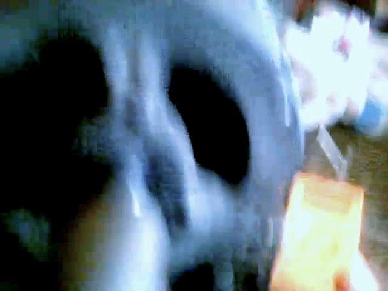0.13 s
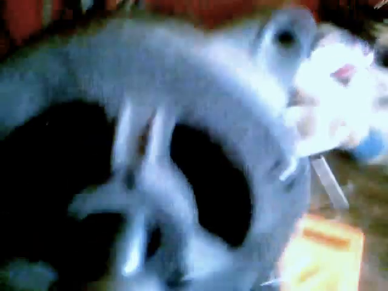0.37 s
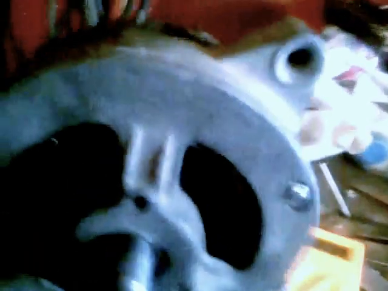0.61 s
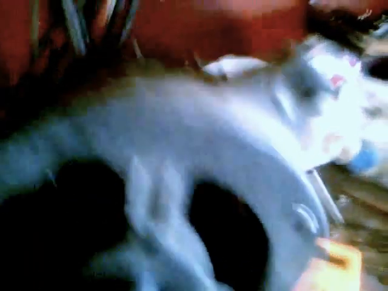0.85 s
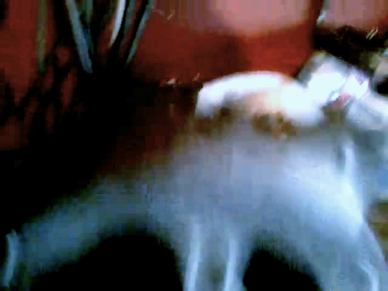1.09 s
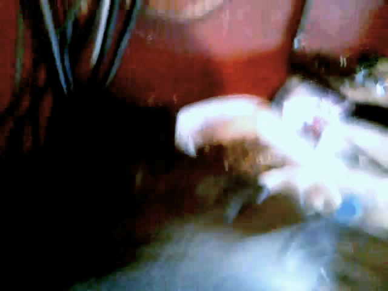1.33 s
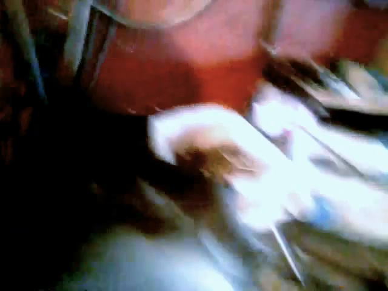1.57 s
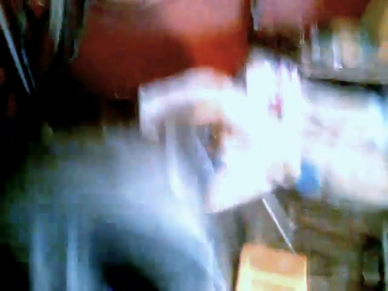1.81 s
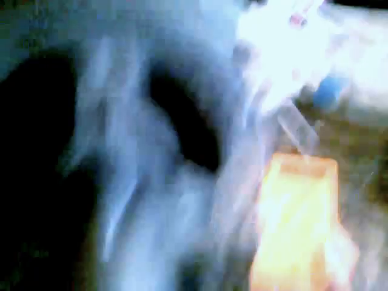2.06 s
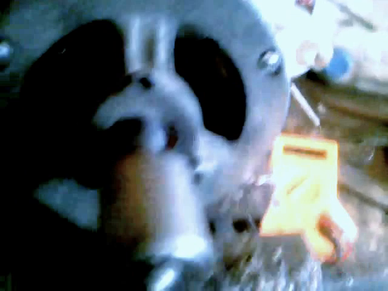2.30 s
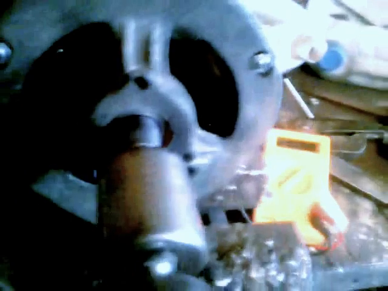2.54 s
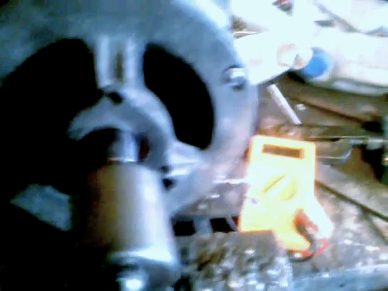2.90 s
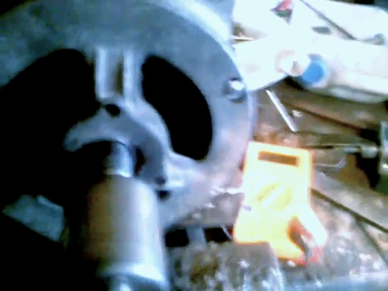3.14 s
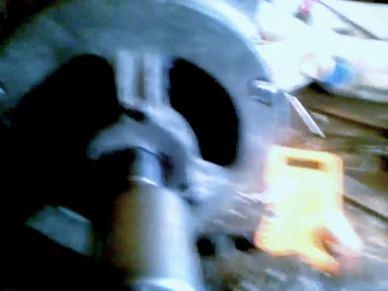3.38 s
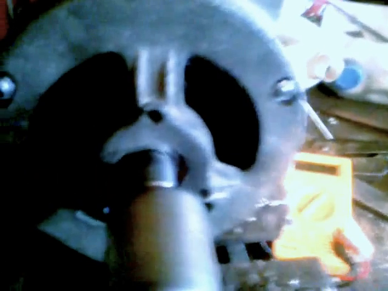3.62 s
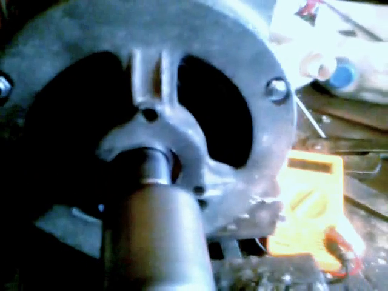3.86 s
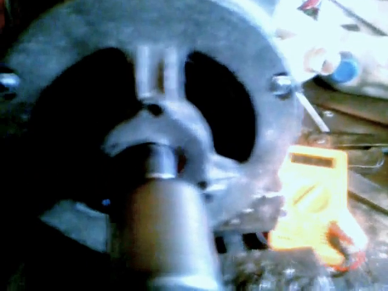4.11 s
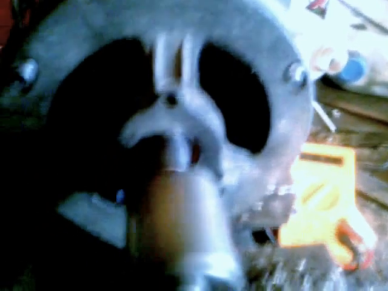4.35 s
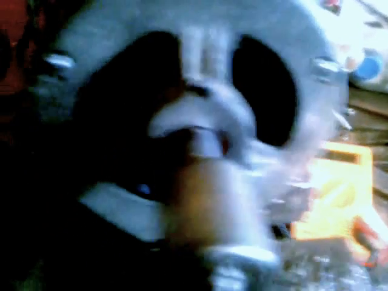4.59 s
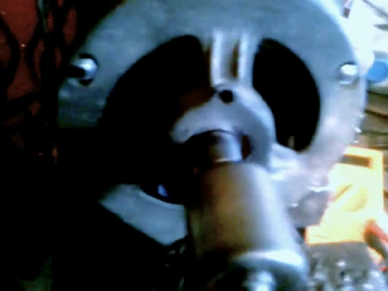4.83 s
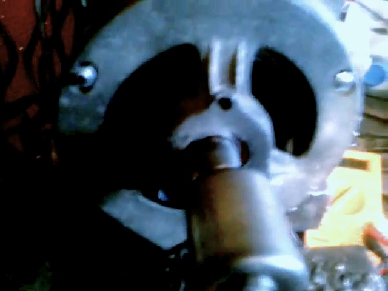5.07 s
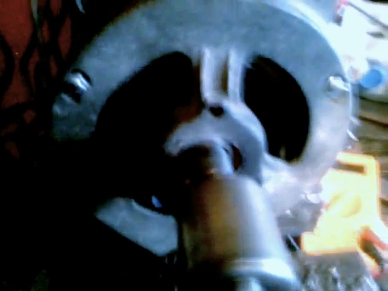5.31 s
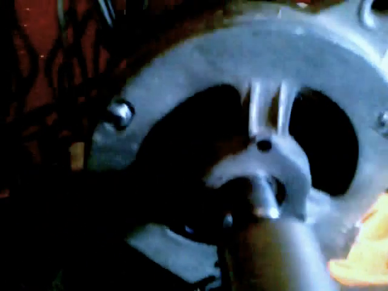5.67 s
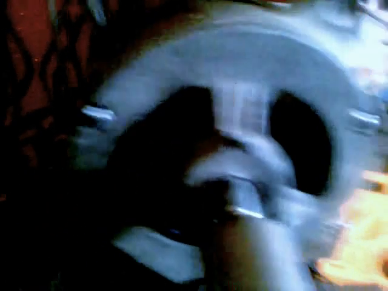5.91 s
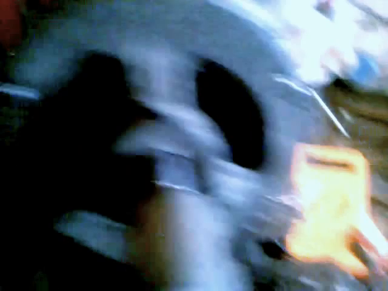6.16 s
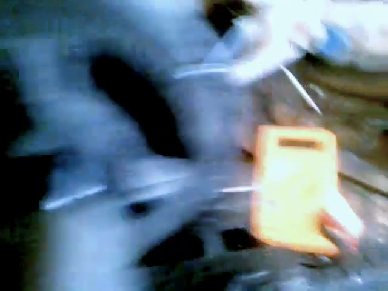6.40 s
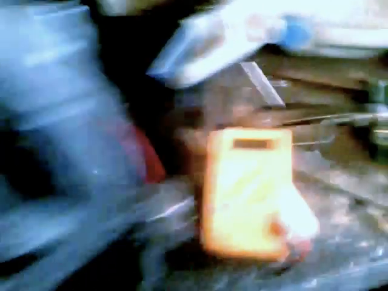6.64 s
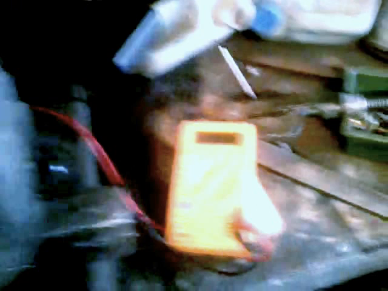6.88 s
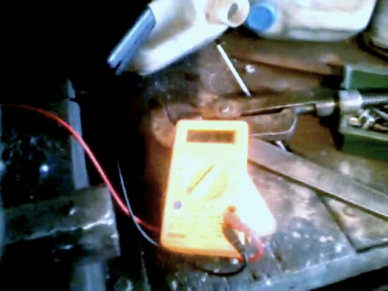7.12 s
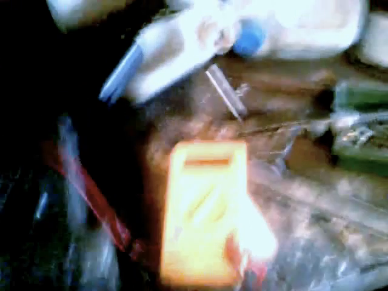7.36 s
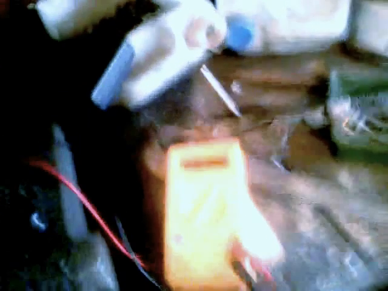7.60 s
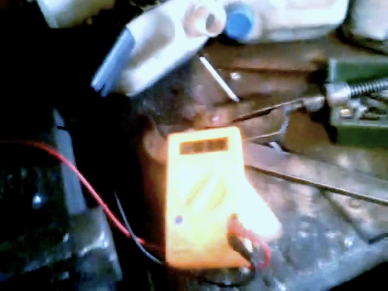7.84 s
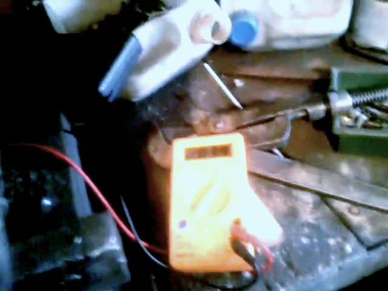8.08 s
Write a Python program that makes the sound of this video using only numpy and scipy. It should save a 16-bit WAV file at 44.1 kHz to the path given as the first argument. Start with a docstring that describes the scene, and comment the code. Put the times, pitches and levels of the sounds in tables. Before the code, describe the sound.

Handling clicks echo lightly, a trigger cracks, and a clattering electric drill runs up into a rough, overloaded grinding whir with a wavering whine.

```python
"""Faint air and hands rubbing a tool: filtered noise, with clicks that ring as rough sines and leave a room tail.
After a brief gap the trigger snaps and a hand drill on a workshop bench starts to spin an alternator.
The loose coupling knocks during run-up, noise bursts ringing the housing, while a low tone swells and bends.
Brushes, gears and fan then merge into a throbbing noise whir, over sines for armature hum and pole whine.
The small mono microphone swings from the alternator's face towards the bench, and its input overloads."""
import sys
import numpy as np
from scipy import signal
from scipy.fft import rfft, irfft
from scipy.io import wavfile

SR = 44100
rng = np.random.default_rng(int(sys.argv[2]) if len(sys.argv) > 2 else 0)


def unload_wav(signal):
    """Save mono or channel-first audio to the path in sys.argv[1] as 16-bit WAV at rate SR, clipped to [-1, 1]."""
    wavfile.write(
        sys.argv[1],
        SR,
        np.round(np.clip(np.atleast_2d(signal).T, -1, 1) * 32767).astype(np.int16),
    )


N = 366912

# Tone of the brush and gear grit, also heard in the scrape of the knocks.
# Each row: frequency in Hz, level in dB per Hz.
GRIT_COLOUR = [(150, -20), (250, -12), (366, -8.5), (435, -10), (535, -5), (1070, -3), (1670, 0.5),
               (1920, 1.5), (3460, -11.5), (4410, -9.5), (6120, -6.5), (10300, -3), (12600, -10),
               (15600, -12.5)]

AIR_DB = -59
DROPOUT_S = (2.881, 2.8935)   # air, hands and clicks fall silent between these times
TRIGGER_S, TRIGGER_DB = 2.8955, -12.5   # the switch snaps: a bare crack
RING_ROUGH = .035   # spread of the phase steps of a click's ring, radians per sample
CRACK_DB, CRACK_T60_S, CRACK_DB_PER_OCTAVE = -2, .008, -10   # relative to the ring, broad around its pitch
TAIL_DB_PER_OCTAVE, TAIL_ATTACK_S = -8.5, .004   # the tail is strongest near the click's own pitch

SWELL_TOP_S, SWELL_HALF_S, SWELL_TOP_HZ, SWELL_BEND_HZ = 3.72, .3, 198, 42
SWELL_DB, SWELL_EDGE_DB = -33.5, -16   # level at the top, change SWELL_HALF_S away from it
SWELL_RING_DB, SWELL_RING_EDGE_DB = -17.5, -70
SWELL_RING_HZ, SWELL_WIDTH_HZ = 2500, 90

REBOUND_S, REBOUND_DB, REBOUND_SCATTER = .0095, -3.5, .15   # each loud knock bounces once
KNOCK_T60_S, KNOCK_CRACK_DB, KNOCK_SPREAD_DB = 0.02, -11, 5
KNOCK_TICK_DB, KNOCK_TICK_T60_S = -24, 0.0025   # the first instant of metal on metal
RATTLE_SPREAD_DB = 6.5

GEAR_RATIO, POLE_PAIRS = 11 / 32, 6   # alternator turns per armature turn, pole cycles per alternator turn
HUM_WAVER_DB, WHINE_WAVER_DB = .8, 3.0
# Armature turns per s between which the labouring sound gives way to the free-running one.
RUN_UP_FROM, RUN_UP_TO = 40, 198
# Each a triple: labouring, free-running and faced, free-running and turned away.
TREBLE_DB, BASS_DB = (-10.5, 4, 2.5), (5, 0.5, 3)
THROB, RATTLE_DB = (0.3, 0.19, 0.22), (-12, -4, -2.5)   # depth per armature turn 0-1; relative to the whir
PEAK_WANDER_DB, RUMBLE_DB = 2.5, -37.5   # rumble relative to the whir
BENCH_ECHO_S, BENCH_ECHO_DB = 0.001082, -16.5
ECHO_SWAY = .12   # spread of the delay as a fraction: the hand is never still

OVERLOAD, KNEE = 0.71, 12   # ceiling of the input stage in full scale, sharpness of its bend
CUTOFF_HZ = 15950


def amp(db):
    """Gain of a level in dB."""
    return 10 ** (np.asarray(db) / 20)


def rms_one(x):
    """Scaled to rms 1."""
    return x / np.sqrt(np.mean(x ** 2) + 1e-20)


def in_time(rows, before):
    """Columns of a table at every sample, with their values ahead of the first row."""
    s, *columns = np.transpose(rows)
    return [np.interp(np.arange(N) / SR, s, c, left=b) for c, b in zip(columns, before)]


def at_hz(points, hz):
    """A spectrum read on a log-frequency axis."""
    point_hz, values = np.array(points).T
    return np.interp(np.log(hz), np.log(point_hz), values)


def drift(rate_hz):
    """Slow random wander of spread 1: noise through two equal low-pass poles, one value per 40 samples."""
    r = np.exp(-80 * np.pi * rate_hz / SR)
    noise = rng.standard_normal(N // 40 + 2002)
    slow = signal.lfilter([1], [1, -2 * r, r * r], noise)[2000:]   # skip the settling
    return np.interp(np.arange(N) / 40, np.arange(len(slow)), rms_one(slow))


def resonance(x, hz, width_hz):
    """Two-pole peak of gain 1 on top."""
    r = np.exp(-np.pi * width_hz / SR)
    gain = (1 - r * r) / 2
    return signal.lfilter([gain, 0, -gain], [1, -2 * r * np.cos(2 * np.pi * hz / SR), r * r], x)


def butter(x, order, hz, kind="low"):
    """Butterworth filter of the given kind."""
    return signal.sosfilt(signal.butter(order, hz, kind, fs=SR, output="sos"), x)


def band(x, low_hz, high_hz):
    """Butterworth band-pass."""
    return butter(x, 2, [low_hz, high_hz], "band")


def coloured(x, spectrum):
    """A spectrum laid on noise."""
    hz = np.maximum(np.fft.rfftfreq(len(x), 1 / SR), 1)
    return irfft(rfft(x) * amp(at_hz(spectrum, hz)), len(x))


def dying(impulses, t60):
    """Each impulse leaves an exponential tail."""
    return signal.lfilter([1], [1, -amp(-60 / (t60 * SR))], impulses + 1e-18)


def by_state(values, free, away):
    """Blend of a labouring, a faced and a turned-away value."""
    labouring, faced, turned = values
    return labouring + free * (faced + away * (turned - faced) - labouring)


def background_air():
    """Steady coloured noise behind everything."""
    # Each row: frequency in Hz, level in dB per Hz.
    air_colour = [(20, 2), (55, 0), (90, -10), (300, -5.5), (850, 0.5), (1600, -2), (2600, -2), (4000, 1),
                  (7000, -1), (10500, -2.5), (12000, -11), (15600, -9)]
    return amp(AIR_DB) * rms_one(coloured(rng.standard_normal(N), air_colour))


def hands():
    """Skin on the housing: a lumpy rumble and a thin rustle."""
    # Hands rubbing the tool. Each row: time in seconds, rumble level in dB, rustle level in dB.
    rubbing = [(0.2, -78, -71), (0.44, -73, -66), (0.73, -63, -45), (0.88, -66, -57), (1.02, -62, -54),
               (1.2, -72, -68), (1.6, -77, -68), (2.2, -78, -71)]
    fade_out = (rubbing[-1][0] + .1, -100, -100)
    rumble_db, rustle_db = in_time(rubbing + [fade_out], before=[-100, -100])
    low = band(band(rng.standard_normal(N), 110, 380), 90, 500)
    rumble = rms_one(low * amp(1.9 * drift(17.0)))
    thin = band(rng.standard_normal(N), 6400, 12000)
    rustle = rms_one(thin * amp(1.1 * drift(60.0)))
    return amp(rumble_db) * rumble + amp(rustle_db) * rustle


def clicks():
    """A brief ring and crack each, followed by the workshop's tail, which dies band by band."""
    # Hands and trigger. Each row: start in seconds, ring level in dB, pitch in Hz, tail level in dB.
    click_list = [(0.237, -38, 1960, -58), (0.518, -38, 10600, -54), (0.642, -38, 2400, -39),
                  (0.651, -41, 2380, -25), (0.672, -13, 8300, -32), (0.678, -15, 8300, -24),
                  (0.686, -5.5, 8200, -23), (0.816, -38, 12000, -58), (0.907, -27, 2120, -39),
                  (0.915, -39, 740, -33), (0.943, -39, 1400, -52), (1.058, -33, 2050, -50),
                  (1.064, -26, 2900, -29), (1.072, -16, 2500, -22), (1.083, -24.5, 8800, -33),
                  (1.085, -27, 1900, -45), (1.090, -26, 2720, -43), (1.253, -50, 1000, -70),
                  (1.365, -54, 1280, -80), (1.586, -41, 1500, -66), (1.822, -30, 1320, -44),
                  (1.824, -33, 694, -40), (1.93, -55, 633, -76), (2.0, -50, 4200, -74),
                  (2.509, -32, 9500, -58), (2.676, -33.5, 9500, -58), (2.836, -41, 10100, -55),
                  (2.8964, -12.5, 1890, -34), (2.897, -18, 5500, -38), (2.922, -31, 4500, -50),
                  (2.944, -24, 4100, -50), (2.962, -20, 4200, -44)]
    # Decay of the rings. Each row: pitch in Hz, time to fall 60 dB in seconds.
    ring_t60 = [(700, 0.043), (1500, .006), (9000, 0.0063)]
    # Decay of the workshop. Each row: frequency in Hz, time to fall 60 dB in seconds.
    room_t60 = [(500, 0.98), (1320, 0.43), (3480, 0.5), (6000, 0.33), (9190, 0.24), (14000, 0.18)]
    # Tone of the tail and of the trigger's crack. Each row: frequency in Hz, level in dB per Hz.
    room_colour = [(410, -47), (700, -5), (1120, -3.5), (1850, 5.5), (2960, 0), (3400, -8.5), (3700, -4),
                   (4970, 1), (9140, 5), (11000, 7), (15600, -13)]
    heard = 4 * SR
    out, trigger = np.zeros((2, heard))
    t = np.arange(SR // 8) / SR
    s, ring_db, pitch_hz, tail_db = np.transpose(click_list)
    starts = np.round(s * SR).astype(int)
    for at, db, hz in zip(starts, ring_db, pitch_hz):
        wander = np.cumsum(rng.normal(0, RING_ROUGH, len(t)))
        ring = np.sin(2 * np.pi * hz * t + wander)
        envelope = (1 - np.exp(-hz * t)) * amp(-60 * t / at_hz(ring_t60, hz))
        out[at:at + len(t)] += amp(db) * ring * envelope
    trigger[round(TRIGGER_S * SR)] = amp(TRIGGER_DB)
    room_noise = rms_one(coloured(rng.standard_normal(heard), room_colour))
    out += dying(trigger, CRACK_T60_S) * room_noise
    white = butter(rng.standard_normal(heard), 4, 11500)
    edges = 500 * 2 ** np.arange(0, 5.1, .5)   # half octaves
    for k, (low_hz, high_hz) in enumerate(zip(edges, edges[1:])):
        hz = np.sqrt(low_hz * high_hz)
        octaves_off = np.abs(np.log2(hz / pitch_hz))
        cracks, sent = np.zeros((2, heard))
        cracks[starts] = amp(ring_db + CRACK_DB + CRACK_DB_PER_OCTAVE * octaves_off)
        crack = band(dying(cracks, CRACK_T60_S) * white, low_hz, high_hz)
        out += crack * np.sqrt(SR / 2 / (high_hz - low_hz))
        # power sent to the walls; half the decay time, since it is power that dies
        sent[starts] = amp(2 * (tail_db + TAIL_DB_PER_OCTAVE * octaves_off))
        power = dying(sent, at_hz(room_t60, hz) / 2) - dying(sent, 6 * TAIL_ATTACK_S)
        shifted = np.roll(room_noise, 999 * k)   # unrelated noise in each band
        out += band(shifted, low_hz, high_hz) * np.sqrt(np.maximum(power, 0))
    return np.pad(butter(out, 4, 550, "high"), (0, N - heard))


def swell():
    """A bending sine and a narrow noise ring of the casing that rise and fall together in the run-up."""
    off = np.clip((np.arange(N) / SR - SWELL_TOP_S) / SWELL_HALF_S, -2, 2) ** 2
    hz = SWELL_TOP_HZ - SWELL_BEND_HZ * off
    tone = np.sqrt(2) * amp(SWELL_DB + SWELL_EDGE_DB * off ** 2) * np.sin(2 * np.pi * np.cumsum(hz) / SR)
    ring = resonance(rng.standard_normal(N), SWELL_RING_HZ, SWELL_WIDTH_HZ)
    ring = resonance(ring, SWELL_RING_HZ, SWELL_WIDTH_HZ)
    return tone + amp(SWELL_RING_DB + SWELL_RING_EDGE_DB * off) * rms_one(ring)


def knocks(turns, rattle_db):
    """Loud coupling knocks, and lighter uneven ones about once per armature turn as the gears take up play;
    each is a short scrape that drives every housing resonance with a strength of its own."""
    # Coupling knocks in run-up, about one per turn of the shaft. Each row: time in seconds, strength in dB.
    loud_knocks = [(2.9732, -7.5), (2.9846, 0.5), (3.0043, 1.5), (3.015, -2), (3.04, 8), (3.0544, -3),
                   (3.0864, 2), (3.1054, -12), (3.1213, -3), (3.1414, -1), (3.1557, 2), (3.1754, -2),
                   (3.1879, 2), (3.2186, 3), (3.253, -1), (3.276, -1), (3.2846, 6), (3.3184, 9), (3.351, 4),
                   (3.3822, 4), (3.411, 2), (3.4414, 1.5), (3.466, 2), (3.49, 1), (3.5151, 5.5),
                   (3.5474, -0.5), (3.5753, -7), (3.5935, 3.5), (3.6275, -5), (3.65, 5), (3.6806, 5),
                   (3.7077, 0), (3.7448, 3), (3.7796, 1), (3.8062, -8), (3.8328, -4), (3.854, 6),
                   (3.8777, 3), (3.903, 0), (3.937, -5), (3.9622, -4), (3.9824, -4), (4.0104, -12),
                   (4.0323, 2)]
    # Resonances of the housing. Each row: frequency in Hz, width in Hz, level in dB.
    housing = [(1220, 260, -25.5), (1460, 270, -1.5), (2293, 154, 4), (2900, 59, 0), (4200, 540, -5),
               (4660, 190, -27), (5405, 150, -2), (6450, 750, -6.5), (7730, 550, -31), (9280, 800, -7.5),
               (10730, 250, -9)]
    s, db = np.transpose(loud_knocks)
    late, soft = rng.standard_normal((len(s), 2)).T
    rebound_s = s + REBOUND_S * (1 + REBOUND_SCATTER * late)
    s, db = np.r_[s, rebound_s], np.r_[db, db + REBOUND_DB + 2 * soft]
    jittered_turns = turns + .08 * drift(40.0)
    each_turn = np.flatnonzero(np.diff(np.floor(jittered_turns)) > 0)
    uneven = rng.normal(0, RATTLE_SPREAD_DB, len(each_turn))
    at = np.concatenate([(s * SR).astype(int), each_turn])
    db = np.concatenate([db, rattle_db[each_turn] + uneven])
    strengths = rng.normal(0, KNOCK_SPREAD_DB, (len(at), len(housing)))
    blows, scrape = np.zeros(N), rng.standard_normal(N)
    blows[at] = amp(db + KNOCK_CRACK_DB)
    out = dying(blows, KNOCK_T60_S) * band(rms_one(coloured(scrape, GRIT_COLOUR)), 560, 9900)
    blows[at] = amp(db + KNOCK_TICK_DB)
    out += dying(blows, KNOCK_TICK_T60_S) * band(scrape, 3000, 16500)
    for (hz, width_hz, mode_db), own_db in zip(housing, strengths.T):
        blows[at] = amp(db + mode_db + own_db)
        out += resonance(dying(blows, KNOCK_T60_S) * scrape, hz, width_hz)
    return out


def tones(turns, hum_db, pole_db):
    """Sines locked to the two shafts: the lowest of each is steadier, the higher ones waver in strength."""
    # Armature hum. Each row: multiple of the armature speed, level in dB relative to the hum level.
    armature = [(1, 5), (4, -23), (6, -33), (8, -2.5), (11, -29), (24, -38), (27, -3.5), (33, -38)]
    # Alternator whine. Each row: multiple of the pole tone, level in dB relative to the pole level.
    poles = [(1, 0), (2, -2), (3, -9), (6, -3), (12, -9), (18, -12), (24, -5)]
    pole_cycles = turns * GEAR_RATIO * POLE_PAIRS
    out = np.zeros(N)
    for cycles, level_db, series in ((turns, hum_db, armature), (pole_cycles, pole_db, poles)):
        for multiple, db in series:
            waver_db = (HUM_WAVER_DB if multiple == 1 else WHINE_WAVER_DB) * drift(7)
            sine = np.sin(2 * np.pi * (multiple * cycles + rng.random()))
            out += np.sqrt(2) * amp(level_db + db + waver_db) * sine
    return out


def commutator(turns, level_db, free, away):
    """Brushes crossing the commutator bars, a rough whine: noise bands on multiples of the speed."""
    # Each row: multiple of the armature speed, low-pass corner of its noise in Hz,
    # level in dB relative to the whir when labouring, when faced, when turned away.
    bars = [(26.62, 500, -30, -5.5, -27), (49.1, 360, -38, -14, -50)]
    out = np.zeros(N)
    for multiple, width_hz, *db in bars:
        rough = rms_one(butter(rng.standard_normal(N), 4, width_hz))
        out += amp(by_state(db, free, away)) * rough * np.sin(2 * np.pi * multiple * turns)
    return amp(level_db) * out


def whir(turns, level_db, free, away):
    """Brush and gear grit, throbbing once per turn, through the casing."""
    # Casing resonances. Each row: frequency in Hz, width in Hz,
    # gain in dB when labouring, when faced, when turned away.
    casing_peaks = [(1095, 64.2, -34, -1, 5.5), (1990, 57, -30, -29, -2), (1975, 68, -8, -11, -6),
                    (2200, 190, 1, -2.5, -7), (4500, 985, -15, -5.5, 0), (5426, 550, -20, -7, 0.5),
                    (7400, 1100, 0.5, 1.5, -12), (10100, 2900, -1, -4.5, -11.5), (13740, 390, -29, -1, -33)]
    grit = rng.standard_normal(N) * amp(1.8 * drift(180.0))
    grit *= 1 + by_state(THROB, free, away) * np.cos(2 * np.pi * turns)
    plain = rms_one(coloured(grit, GRIT_COLOUR))
    casing = plain.copy()
    for hz, width_hz, *db in casing_peaks:
        peak_db = by_state(db, free, away) + PEAK_WANDER_DB * drift(0.64)
        casing += amp(peak_db) * resonance(plain, hz, width_hz)
    low = amp(by_state(BASS_DB, free, away)) * butter(casing, 2, 900)
    high = amp(by_state(TREBLE_DB, free, away)) * butter(casing, 2, 3200, "high")
    mix = low - band(casing, 1200, 3560) + high
    rumble = amp(RUMBLE_DB) * rms_one(band(grit, 60, 256))   # the bench shakes
    return amp(level_db) * (rms_one(mix) + rumble)


def bench_echo(x):
    """One reflection whose path shifts as the microphone sways."""
    lag = BENCH_ECHO_S * SR * (1 + ECHO_SWAY * drift(.4))
    return x + amp(BENCH_ECHO_DB) * np.interp(np.arange(N) - lag, np.arange(N), x)


def scene():
    """Everything reaches one microphone, the drill's noise with an echo off the bench."""
    # Drill armature. Each row: time in seconds, speed in turns per s, hum level in dB, pole tone level in dB.
    armature_course = [(2.9, 67, -79, -73), (3.0, 64, -47, -43), (3.3, 103, -52.5, -39),
                       (3.55, 91, -51, -48), (3.8, 124, -64, -42), (4.0, 147, -44.5, -54),
                       (4.45, 162, -46, -33), (4.9, 164, -31, -33), (5.25, 166, -34.5, -36),
                       (5.54, 177, -27.5, -31), (5.6, 176, -47, -28), (5.68, 178, -29, -30.5),
                       (5.95, 182.5, -28, -30), (6.7, 184, -28.5, -34), (7.05, 172, -34, -32.5),
                       (7.4, 168, -23.5, -35), (8.32, 176, -25.5, -51)]
    # Each row: time in seconds, whir level in dB.
    whir_course = [(2.893, -49), (2.9, -27.5), (2.965, -28.5), (2.99, -9), (3.07, -11), (3.87, -10.5),
                   (4.05, -7), (4.3, -6), (5, -7), (6, -7), (7.2, -5), (8.32, -5.5)]
    # The hand-held microphone swings from the alternator's face to the bench beside it.
    # Each row: time in seconds, turned away 0-1.
    swing = [(5.2, 0.01), (5.9, 0.08), (6.45, 0.6), (7.0, 1)]
    speed, hum_db, pole_db = in_time(armature_course, before=[0, -120, -120])
    level_db, = in_time(whir_course, before=[-120])
    away = np.clip(in_time(swing, before=[0])[0], 0, 1)
    free = np.clip((speed - RUN_UP_FROM) / (RUN_UP_TO - RUN_UP_FROM), 0, 1)
    turns = np.cumsum(speed) / SR
    t = np.arange(N) / SR
    heard = (t < DROPOUT_S[0]) | (t > DROPOUT_S[1])
    background = heard * (background_air() + hands() + clicks())
    rattle_db = level_db + by_state(RATTLE_DB, free, away)
    drill = swell() + knocks(turns, rattle_db) + tones(turns, hum_db, pole_db)
    drill += bench_echo(commutator(turns, level_db, free, away) + whir(turns, level_db, free, away))
    mono = background + drill
    return np.array([mono, mono])


def record(dry):
    """The input stage flattens the peaks, the top is cut without phase shift."""
    flattened = dry / (1 + np.abs(dry / OVERLOAD) ** KNEE) ** (1 / KNEE)
    cut = signal.cheby2(16, 30, CUTOFF_HZ, fs=SR, output="sos")
    return np.clip(signal.sosfiltfilt(cut, flattened), -1, 1)


dry = scene()
out = record(dry)
unload_wav(out)
```